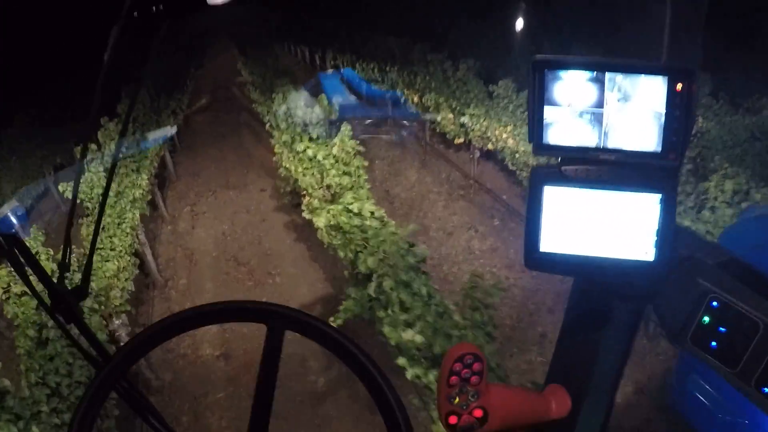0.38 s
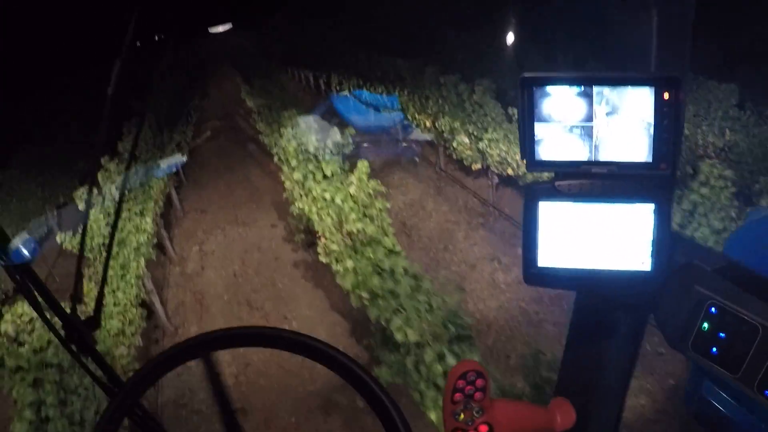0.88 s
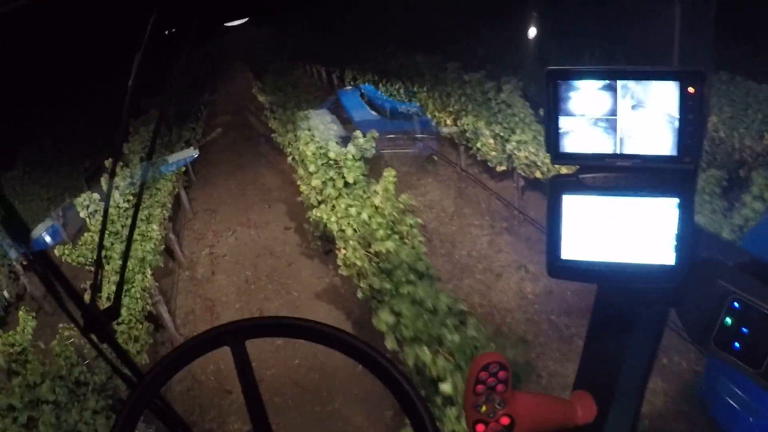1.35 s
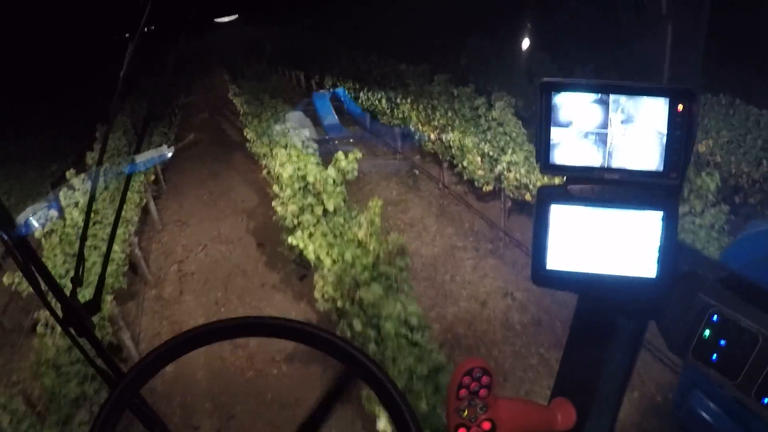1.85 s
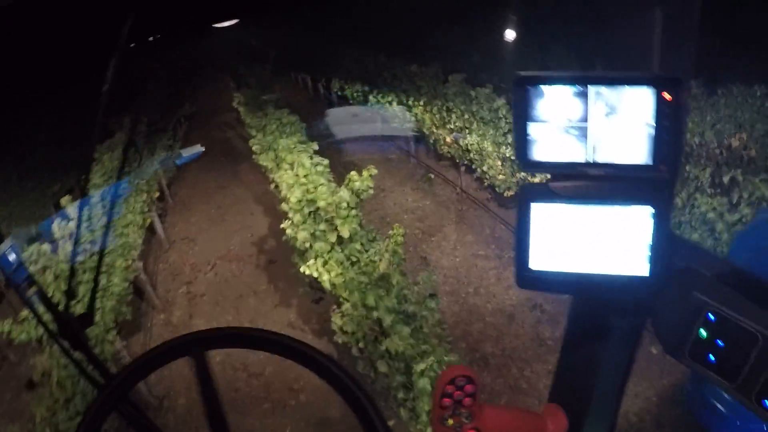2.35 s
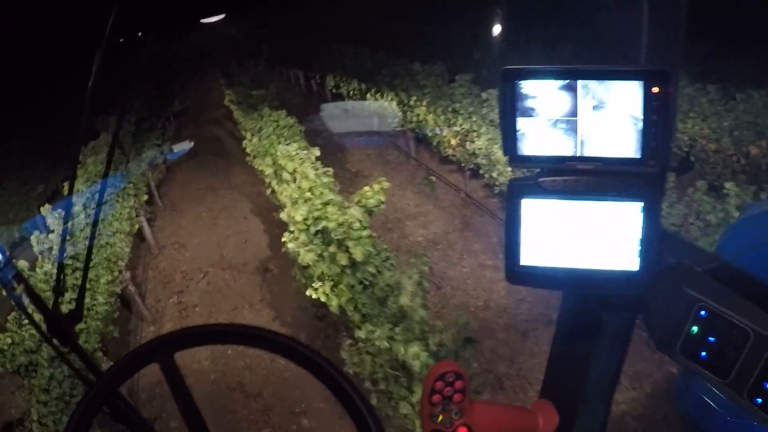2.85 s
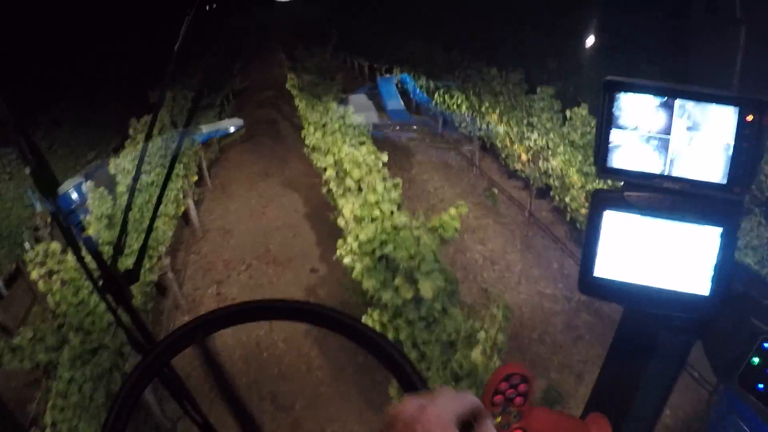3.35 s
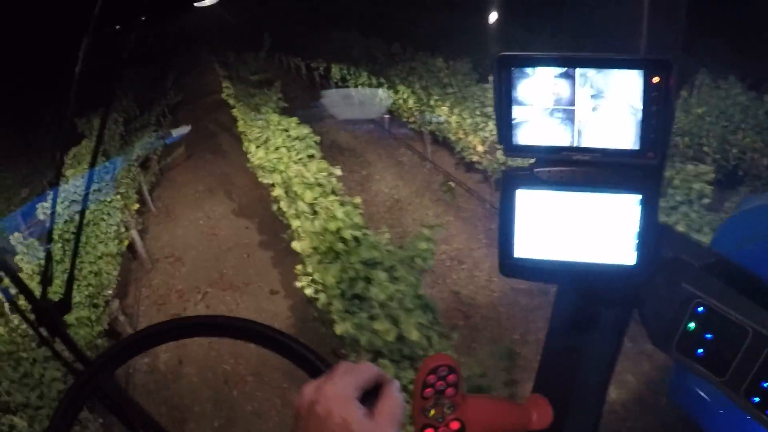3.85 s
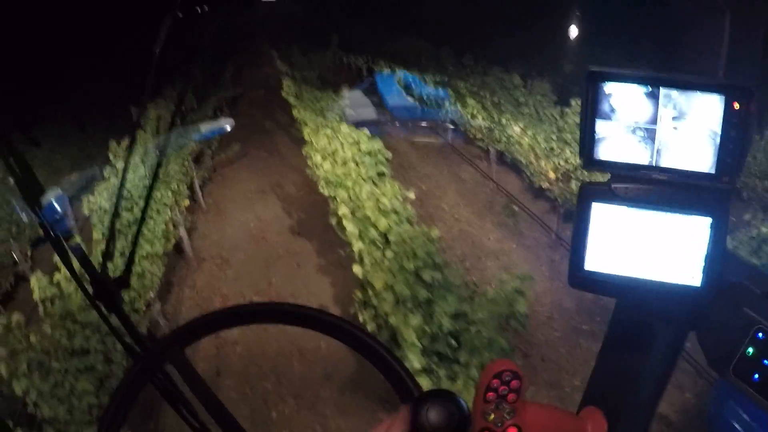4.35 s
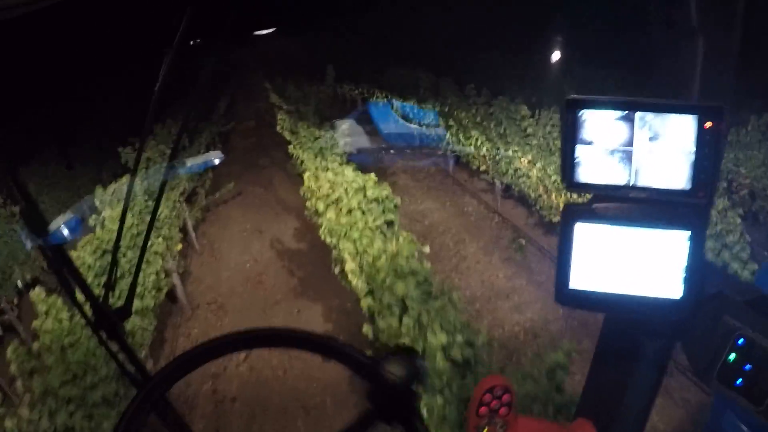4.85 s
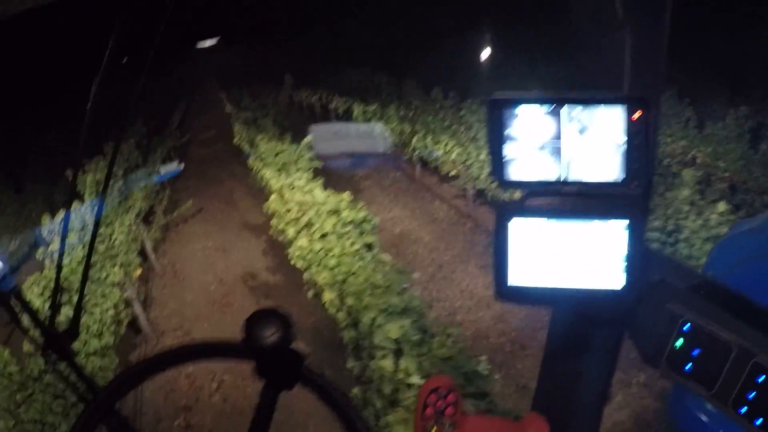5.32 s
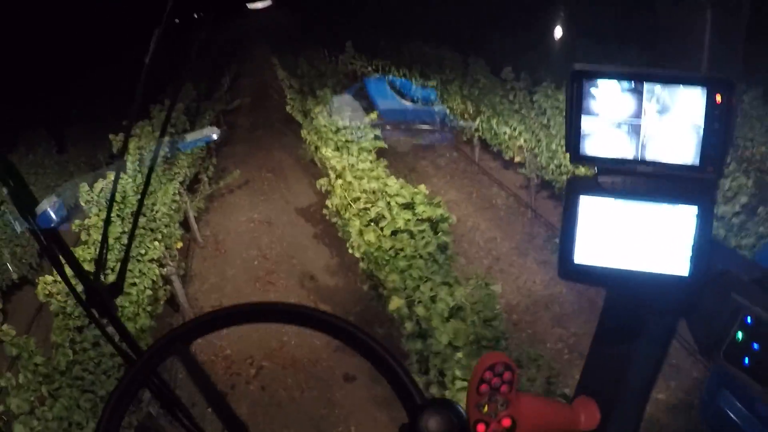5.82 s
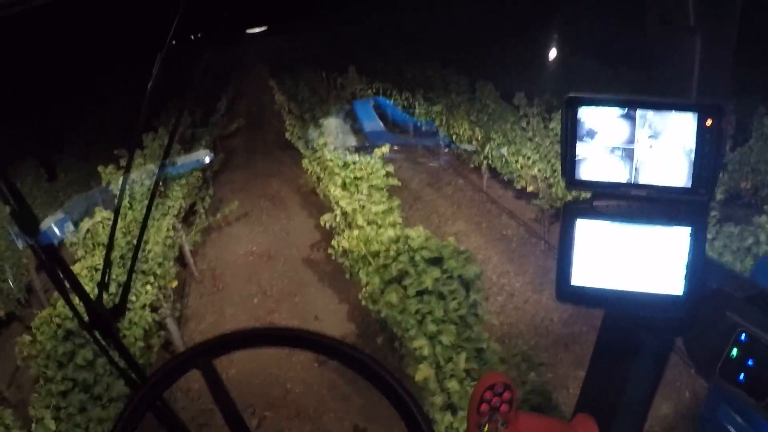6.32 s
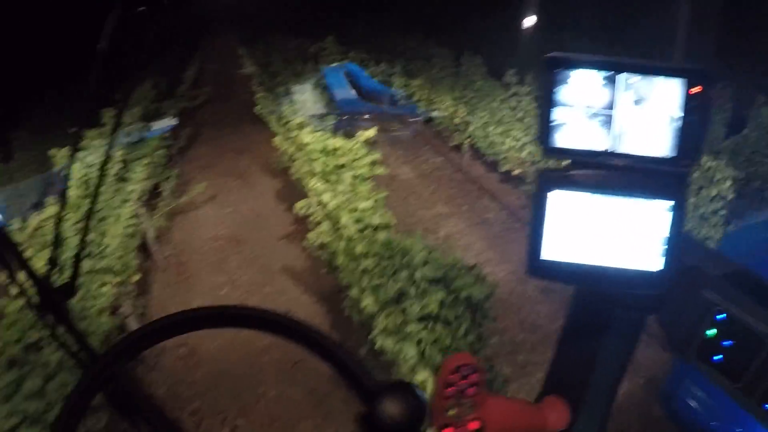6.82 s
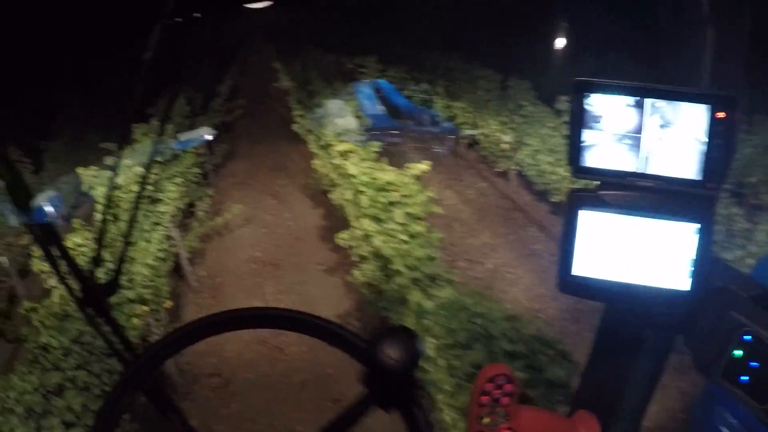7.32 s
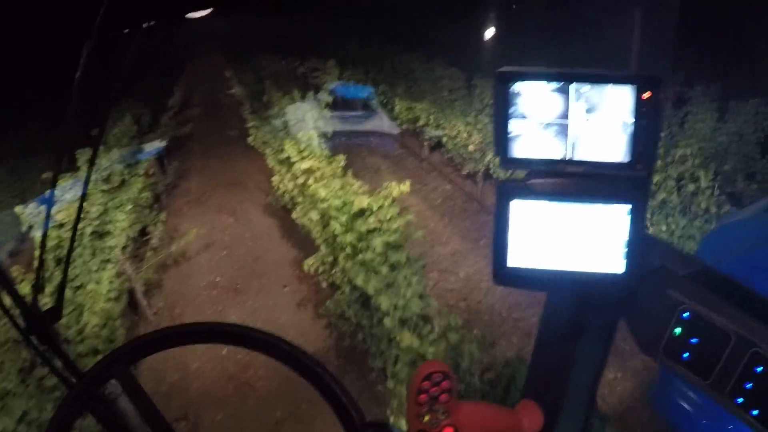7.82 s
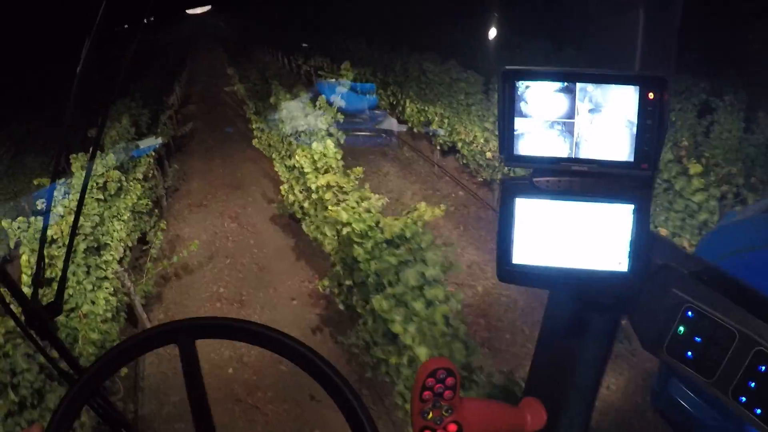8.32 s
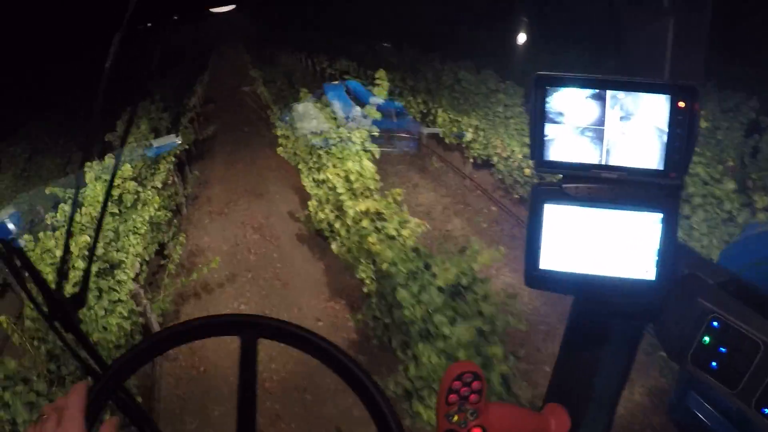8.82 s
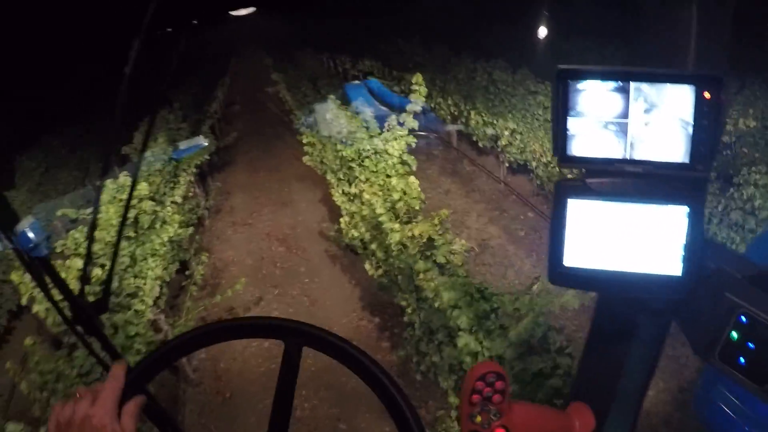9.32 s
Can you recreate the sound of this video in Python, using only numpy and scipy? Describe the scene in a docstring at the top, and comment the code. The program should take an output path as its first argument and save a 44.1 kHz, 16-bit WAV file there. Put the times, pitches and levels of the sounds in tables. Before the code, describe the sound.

Close, enclosed stereo sound in a working farm machine's cab: constant low engine tone, panel boom, midrange roar and thin wavering tones. Bright swishes and duller thrashes of foliage flicker rapidly and unevenly over leaf rustle. Dry snaps come in the first two seconds and again after six. The pump hum dips slightly in pitch near one second and again near eight, its level rising and falling.

```python
"""Inside a grape harvester's cab, a diesel drones (sines) over the boom of the cab and the roar of belts (shaped noise).
Thin sines sound among them. Shaker rods thrash the vines in noise bursts over a steady rustle; twigs snap as sharp,
fading noise in the first two seconds. A hydraulic pump, also sines, hums just above twice the firing rate: its pitch
drops at about 1 s, its whine comes out near 2 s and fades. From 6 s twigs snap again; near 7 s the whine returns,
then the strokes crowd together and, at about 8 s, the pump drops once more."""
import sys
import numpy as np
from scipy import signal
from scipy.fft import rfft, irfft, next_fast_len
from scipy.io import wavfile
from scipy.ndimage import uniform_filter1d, map_coordinates

SR = 44100
rng = np.random.default_rng(int(sys.argv[2]) if len(sys.argv) > 2 else 0)


def inscribe(sig):
    """Save sig as 16-bit PCM at rate SR to the path in sys.argv[1].

    A 1-D sig is mono; a 2-D sig holds one channel per row.
    Samples are clipped to [-1, 1] before scaling.
    """
    pcm = np.round(np.clip(np.atleast_2d(sig).T, -1, 1) * 32767)
    wavfile.write(sys.argv[1], SR, pcm.astype(np.int16))


def makeup_ratio(level_db):
    """Linear amplitude ratio for a level in decibels (20 dB per factor of ten)."""
    decades = np.asarray(level_db, float) / 20
    return 10 ** decades


N = 426888  # length in samples

# how thick the vine is, heard as the level of its rustle: time_s, rustle_db
VINE_THICKNESS = [(0, -35), (.59, -34.5), (1.18, -30.5), (1.45, -35), (1.8, -30), (2.1, -34.5), (2.61, -32),
                  (3.2, -37), (3.48, -30.5), (3.7, -33.5), (4.5, -34), (4.82, -31.5), (5.1, -33),
                  (7.09, -34.5), (7.33, -31), (7.71, -33), (8.19, -30), (9.02, -34.5), (9.33, -29.5),
                  (9.55, -36.5), (9.68, -33)]
# strongest rod strokes, before their grain: time_s, swish_db, length_ms, thrash_over_swish_db
STRONG_STROKES = [(.065, -24.5, 54, -5), (.352, -29, 40, -2), (.7, -25, 45, -10), (.74, -31, 60, 3),
                  (.824, -22.5, 89, -1), (1, -24, 23, 0), (1.102, -22, 22, -5), (1.172, -25, 56, -4),
                  (1.322, -25, 46, -1), (1.605, -28, 33, -6), (1.745, -21, 43, 0), (1.809, -22.5, 16, -14),
                  (1.924, -27, 43, -2), (2.01, -24.5, 32, -3), (2.122, -24, 32, -15), (2.145, -29, 28, 4),
                  (2.289, -26, 45, 0), (2.499, -27, 48, -2), (2.637, -23.5, 37, 0), (2.75, -31, 80, 4),
                  (2.948, -29, 38, -1), (3.316, -27.5, 37, 0.5), (3.415, -30.5, 70, 1), (3.533, -27, 89, 0),
                  (3.947, -27, 57, 2.5), (4.366, -25.5, 48, 1), (4.615, -29, 47, -5), (4.78, -30, 60, 0),
                  (4.909, -25.5, 89, -1), (5.186, -29.5, 67, -2), (5.735, -27, 42, -1),
                  (5.984, -25.5, 104, -1), (6.112, -25, 35, -5), (6.297, -26.5, 36, -1),
                  (6.417, -29, 20, 0), (6.483, -27.5, 74, -1), (6.867, -27, 29, 0), (7.307, -24, 81, -3),
                  (7.376, -24, 27, -4), (7.7, -20, 39, -3), (7.812, -26, 48, 0), (7.868, -26, 39, -6),
                  (7.96, -26.5, 52, 2), (8.006, -26, 38, -18), (8.112, -25.5, 16, -5),
                  (8.16, -19.5, 27, -10), (8.246, -25.5, 140, 0), (8.342, -25, 41, 3), (8.512, -26, 16, 0),
                  (8.667, -25, 27, -14), (8.821, -24.5, 47, -4), (9.07, -26, 44, -4),
                  (9.18, -21.5, 56, -5.5), (9.24, -23.5, 24, -1), (9.325, -19, 25, -14),
                  (9.402, -28, 21, 2), (9.499, -28, 89, -1)]
# tone colour of bright swishes and snaps: frequency_hz, relative_level_db (per Hz)
BRIGHT_COLOUR = [(900, -120), (2200, -24), (3500, -8), (4500, -6.5), (6300, 2.5), (7500, -2), (9000, -9),
                 (12400, -21), (14500, -30), (15100, -50)]
# narrow ringing of frame and rods: frequency_hz, width_hz, added_level_db
FRAME_RINGING = [(1133, 12, 2), (1221, 16, 1), (1776, 25, -3), (1950, 20, -5), (2194, 25, -3),
                 (3730, 25, -11), (4050, 25, -10), (4360, 30, -12), (5910, 40, -8), (6545, 40, -7)]


def unit(x):
    """Scale a sound so that its rms (average strength) is 1."""
    return x / np.sqrt(np.mean(x ** 2) + 1e-20)


def along(hz_points, values, hz):
    """Read values between points on a log-frequency axis, closer to how we hear pitch."""
    return np.interp(np.log(hz + 1), np.log(hz_points + 1), values)


def curves(rows):
    """Join the points of a table by straight lines: one curve for each column after the time."""
    time_s, *columns = np.transpose(rows)
    return [np.interp(np.arange(N) / SR, time_s, column) for column in columns]


def wobble(rate):
    """A smooth random curve around zero, drawn through `rate` random points a second."""
    points = rng.standard_normal(int(N * rate / SR) + 4)
    return map_coordinates(points, [np.arange(N) * rate / SR])


def tone(hz, db, pan_db, lead):
    """A sine of moving pitch and rms level; the left leads by `lead` radians and is pan_db louder."""
    cycles = np.cumsum(hz + np.zeros(N)) / SR + rng.random()
    phase = 2 * np.pi * cycles
    side = np.array([[.5], [-.5]])  # left, right
    return np.sqrt(2) * makeup_ratio(db + pan_db * side) * np.sin(phase + lead * side)


def rush(spectrum, patchy_db, modes=()):
    """Stereo noise of rms 1 with random patches, a tone colour and resonances, partly shared by the sides."""
    # the two microphone ports: frequency_hz, likeness (0-1), left_lead_radians, left_over_right_db
    port_rows = [(30, 1, .04, 0), (90, .995, .1, .4), (220, .97, .12, 1.4), (500, .93, -.2, 2.7),
                 (800, .4, .6, 3), (1200, .2, 2.2, -.5), (1800, .65, 1.3, -.6), (2450, .3, -2.8, 0),
                 (2750, .12, -2, -.4), (3300, .45, .2, -.5), (4200, .38, .4, -.7), (4800, .06, -2.6, 0),
                 (5500, .2, -2.7, -3), (6200, .38, -2, -1.2), (7300, .5, -2.4, 2.5), (8300, .33, 3.1, -2),
                 (9700, .3, 2.5, -4), (11200, .12, 1.5, -13), (12500, .08, 1, -14), (13800, .05, .6, -20),
                 (15000, .05, 0, -9)]
    grid = signal.stft(rng.standard_normal((2, N)), nperseg=512)[2]
    # smoothed over frequency, then over time; the same patches on both sides
    patches = uniform_filter1d(rng.standard_normal(grid.shape[1:]), size=5, axis=0)
    patches = uniform_filter1d(patches, size=8, axis=1)
    pair = signal.istft(grid * makeup_ratio(patchy_db * unit(patches)), nperseg=512)[1][:, :N]

    padded = next_fast_len(N + SR // 4)
    hz = np.fft.rfftfreq(padded, 1 / SR)
    ring = 1
    for center, width, db in modes:
        ring = ring + makeup_ratio(db) * 1j * hz * width / (center ** 2 - hz ** 2 + 1j * hz * width)
    colour = makeup_ratio(along(*np.transpose(spectrum), hz))
    left, other = rfft(pair, padded) * colour * ring

    port_hz, alike, lead, pan_db = np.transpose(port_rows)
    shared = along(port_hz, alike * np.exp(-1j * lead), hz)  # what the right port takes from the left
    right = shared * left + np.sqrt(1 - np.abs(shared) ** 2) * other
    tilt = makeup_ratio(along(port_hz, pan_db, hz) / 2)
    return unit(irfft([left * tilt, right / tilt], padded)[:, :N])


def cab_boom():
    """Low noise shaped like the boom of cab and panels, its level slowly wavering."""
    # tone colour of the boom: frequency_hz, relative_level_db (per Hz)
    boom_colour = [(14, -30), (22, -8), (42, -3.5), (55, -5), (70, -4), (95, -1.5), (125, -6), (155, -4.5),
                   (185, -14), (220, 2), (250, -3.5), (290, -15.5), (340, -14), (450, -55), (900, -120)]
    level_db = -20 + 0.63 * wobble(2.31)
    return makeup_ratio(level_db) * rush(boom_colour, patchy_db=.5)


def belts_and_blowers():
    """The roar of belts and blowers: noise that follows how hard they work and rings the frame."""
    # tone colour of the roar: frequency_hz, relative_level_db (per Hz)
    roar_colour = [(120, -120), (250, -9), (320, 1), (380, 11), (425, 4), (490, 8.5), (540, 7), (640, 0),
                   (800, 0.5), (950, -3), (1200, -2.5), (1450, -5.5), (1950, -7.5), (2350, -13),
                   (3500, -24), (7000, -120)]
    # how hard belts and blowers work: time_s, roar_db
    work_rows = [(0, -25.5), (.91, -24), (1.67, -25), (2.9, -26), (3.15, -24), (4.6, -25.5), (5.39, -24.5),
                 (6.93, -27), (7.98, -24), (9.11, -26), (9.68, -27)]
    (work_db,) = curves(work_rows)
    return makeup_ratio(work_db + 0.18 * wobble(13)) * rush(roar_colour, patchy_db=0.5, modes=FRAME_RINGING)


def thin_tones():
    """Thin tones of the machine, among them the pump's faint fourth harmonic near 679 Hz: wavering sines."""
    # one tone a row: pitch_hz, level_db, drift_hz, waver_db, left_over_right_db, left_lead_radians
    tone_rows = [(26.9, -35, .3, 2, 0, 0), (36.3, -33, .3, 2, 0, .03), (113, -37, .5, 2.5, .5, .1),
                 (214, -31, 2, 2.5, 1.5, .13), (278.6, -32, .6, 2, 4, 0), (448.5, -43, 1.2, 2.5, 2, 0),
                 (557.5, -40, 1.2, 2, 5.5, .1), (679, -52, 1.5, 2, 2, 0), (2689, -56, 2.5, 2, 1.2, 1.1),
                 (2935, -63, 4, 1.5, 0, 0)]
    return sum(tone(hz + drift_hz * wobble(3), db + waver_db * wobble(8), pan_db, lead)
               for hz, db, drift_hz, waver_db, pan_db, lead in tone_rows)


def pump():
    """Pump pistons give three harmonics here that swell and fade, and a gear whine blurred by fast jitter."""
    # the pump slows in two steps: time_s, piston_rate_hz
    speed_rows = [(0, 170.85), (.8, 170.8), (1.5, 169.85), (7.7, 169.8), (8.3, 168.8), (9.68, 168.7)]
    # the hum swells and fades: time_s, first_harmonic_db
    hum_rows = [(0, -25.5), (.3, -31), (.9, -28), (1.25, -17), (1.6, -16), (2.9, -18), (3.4, -24),
                (4.5, -16), (5.05, -24), (5.5, -17), (6.2, -14.5), (7, -19), (7.6, -22.5), (7.85, -31),
                (8.1, -24.5), (8.4, -29.5), (8.8, -19.5), (9.68, -17)]
    # slow level of the overtones: time_s, second_harmonic_db, third_harmonic_db
    overtone_rows = [(0, -28.5, -32.5), (.7, -26, -27), (1.15, -38, -27), (1.6, -28, -28), (3, -28.5, -28),
                     (3.7, -26.5, -27.5), (4.3, -26, -28.5), (4.85, -35.5, -26), (5.3, -28, -27.5),
                     (6.8, -28.5, -28.5), (7.4, -32, -28), (8, -27, -27.5), (8.8, -26, -28.5),
                     (9.1, -30, -33), (9.68, -24.5, -35)]
    # how each harmonic reaches the two ports: left_over_right_db, left_lead_radians
    harmonic_ports = [(1, 0.29), (-1, -0.58), (1.5, -0.49)]
    # the whine comes and goes: time_s, whine_db
    whine_rows = [(0, -52), (.7, -52), (1.3, -48), (1.9, -44), (2.9, -50), (3.2, -60), (5.5, -58), (7, -50),
                  (7.2, -44), (7.6, -45), (7.9, -56), (9.68, -53)]
    piston_hz = curves(speed_rows)[0] + .12 * wobble(2)
    levels_db = curves(hum_rows) + [db + 1.4 * wobble(3.5) for db in curves(overtone_rows)]
    hum = 0
    for k, (db, (pan_db, lead)) in enumerate(zip(levels_db, harmonic_ports), start=1):
        hum = hum + tone(k * piston_hz, db + 0.34 * k * wobble(20), pan_db, lead)

    whine_hz = 40.33 * piston_hz + 6 * wobble(60)  # tied to the pump speed
    (whine_db,) = curves(whine_rows)
    return hum + tone(whine_hz, whine_db + 1.5 * wobble(25), pan_db=2.5, lead=-2.1)


def diesel():
    """Regular firing gives the main tone; weaker crankshaft orders follow its pitch but waver on their own."""
    # other engine tones: firing_rate_multiple, level_db, waver_db, left_over_right_db, left_lead_radians
    order_rows = [(.5, -27, 2, 0, .05), (1.5, -31, 2, .6, .1), (2, -35, 2, .8, .1), (3, -30, 3, 1.1, .07),
                  (11.02, -57, 2, 0, 0), (12, -41, 1.5, -5, -2.8)]
    # the governor holds the speed but hunts a little around it
    firing_hz = 81.3 + .15 * wobble(1.5)
    firing_db = -15.2 + .7 * wobble(2.83) + 0.8 * wobble(14)  # slow surge and quicker waver
    firing = tone(firing_hz, firing_db, pan_db=0.36, lead=0.11)
    orders = sum(tone(multiple * firing_hz, db + waver_db * wobble(5), pan_db, lead)
                 for multiple, db, waver_db, pan_db, lead in order_rows)
    return firing + orders


def snaps():
    """A snapping twig is a sudden bright crack that dies within a few hundredths of a second."""
    # when twigs snap and roughly how high they peak: time_s, peak_db
    snap_rows = [(0.0588, -22), (0.6914, -13), (0.8136, -17), (0.9967, -21), (1.6522, -20), (2.0024, -18),
                 (2.1146, -19), (6.1056, -22), (6.2921, -20), (7.6945, -19), (8.0043, -19), (8.1554, -19),
                 (8.6613, -20), (9.1521, -18), (9.2325, -18), (9.3188, -18)]
    t60_s, crest_db = 0.045, 8.5  # time to fall 60 dB; allowance for peak over rms
    time_s, peak_db = np.transpose(snap_rows)
    kicks = np.bincount(np.round(time_s * SR).astype(int), makeup_ratio(peak_db - crest_db), N)
    fade = makeup_ratio(-60 * np.arange(SR // 10) / SR / t60_s)
    envelope = np.abs(signal.fftconvolve(kicks, fade)[:N])
    return envelope * rush(BRIGHT_COLOUR, patchy_db=0)


def rustle():
    """Steady noise of leaves and fruit, louder where the vine is thicker."""
    # tone colour of the rustle: frequency_hz, relative_level_db (per Hz)
    rustle_colour = [(600, -120), (1500, -22), (2350, -3), (3200, -3.5), (4300, -7.5), (6200, -1),
                     (7200, -1.5), (8200, -9.5), (10000, -12.5), (11500, -24.5), (12500, -21), (14000, -30),
                     (14800, -41), (15100, -60)]
    (thickness_db,) = curves(VINE_THICKNESS)
    return makeup_ratio(thickness_db + 1.03 * wobble(18)) * rush(rustle_colour, patchy_db=1.5, modes=FRAME_RINGING)


def crackle(per_second, life_s):
    """A jagged gain: many small leaf and stem contacts, each a sudden rise and a quick decay."""
    count = int(per_second * N / SR)
    place, chance = rng.random((count, 2)).T
    sizes = -np.log(1 - chance)  # many small, few large
    spikes = np.bincount((place * N).astype(int), sizes, N)
    decay = np.exp(-np.arange(SR // 20) / SR / life_s)
    return unit(signal.fftconvolve(spikes, decay)[:N])


def light_strokes():
    """Lighter strokes fall near each shaker beat that has no strong one close by."""
    beat_hz, first_beat_s = 7.21, .054
    beat_s = np.arange(first_beat_s, N / SR, 1 / beat_hz)
    late, size, long, dull = rng.uniform(-1, 1, (4, len(beat_s)))
    time_s = beat_s + .032 * late
    level_db = np.interp(beat_s, *np.transpose(VINE_THICKNESS)) + 0.5 + 3.2 * size
    length_ms = 29 * np.exp(0.72 * long)
    thrash_over_swish_db = -3 + 6.4 * dull
    strong_s = np.transpose(STRONG_STROKES)[0]
    free = np.abs(beat_s[:, None] - strong_s).min(axis=1) > .4 / beat_hz
    rows = np.transpose([time_s, level_db, length_ms, thrash_over_swish_db])
    return list(rows[free])


def rod_strokes():
    """Each stroke swells as the rod sweeps in and dies more slowly: a bright swish and a duller thrash."""
    # tone colour of the duller thrash: frequency_hz, relative_level_db (per Hz)
    thrash_colour = [(150, -120), (400, -23), (800, 0.5), (1150, 3), (1450, -2.5), (1850, -0.5), (2400, -7),
                     (3400, -7), (4500, -49), (9000, -120)]
    t = np.arange(N) / SR
    swish_power, thrash_power = np.zeros(N), np.zeros(N)
    for time_s, db, length_ms, dull_db in STRONG_STROKES + light_strokes():
        near = slice(max(round((time_s - .25) * SR), 0), round((time_s + .35) * SR))
        late = (t[near] - time_s) * 1000 / length_ms  # negative before the peak
        drop = np.where(late < 0, (-late / 0.26) ** 3.9, (late / 0.39) ** 1.57)
        power = makeup_ratio(2 * db) * np.exp(-drop)  # twice the dB turns amplitude into power
        swish_power[near] += power
        thrash_power[near] += power * makeup_ratio(2 * dull_db)
    grain = 0.52 + 0.21 * crackle(per_second=360, life_s=0.0024)
    bright = np.sqrt(swish_power) * rush(BRIGHT_COLOUR, patchy_db=-0.5, modes=FRAME_RINGING)
    dull = np.sqrt(thrash_power) * rush(thrash_colour, patchy_db=1.5, modes=FRAME_RINGING)
    return grain * (bright + dull)


def scene():
    """Everything heard at the driver's seat, added together."""
    machine = cab_boom() + belts_and_blowers() + thin_tones() + pump() + diesel()
    return machine + snaps() + rustle() + rod_strokes()


def band_limit(x):
    """A steep low-pass at the top of the band."""
    return signal.sosfilt(signal.butter(12, 15320, fs=SR, output="sos"), x)


def record(dry):
    """The microphone input smoothly rounds off the highest peaks, keeping them below 0.93."""
    soft = dry / (1 + np.abs(dry / .93) ** 4.5) ** (1 / 4.5)
    return band_limit(soft)


dry = scene()
out = record(dry)
inscribe(out)
```